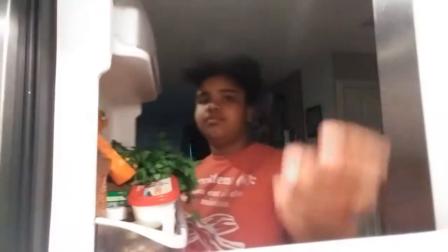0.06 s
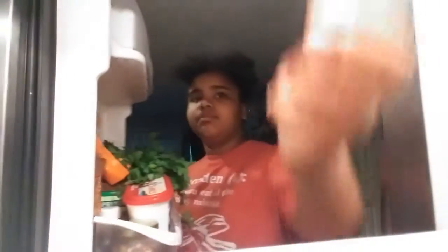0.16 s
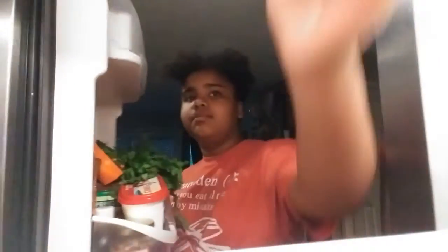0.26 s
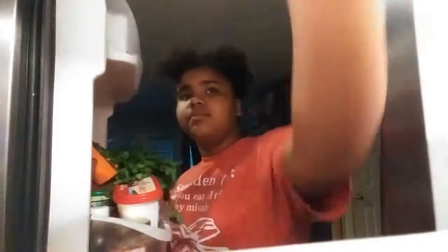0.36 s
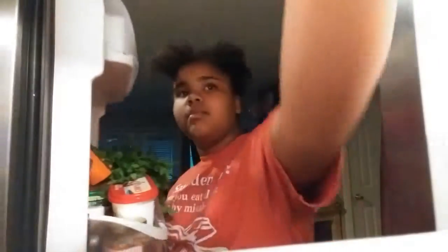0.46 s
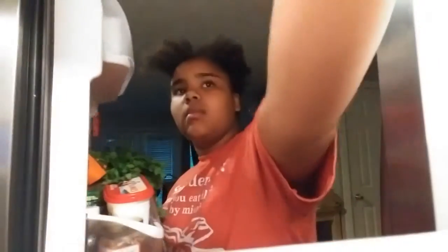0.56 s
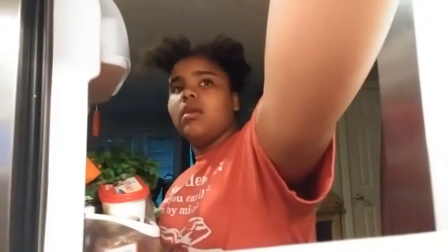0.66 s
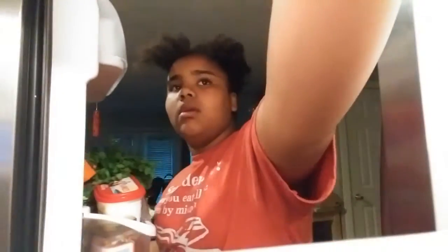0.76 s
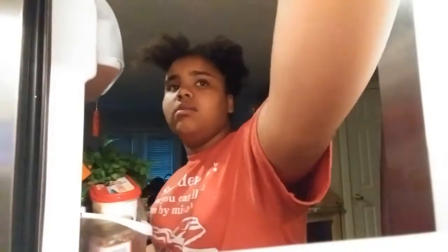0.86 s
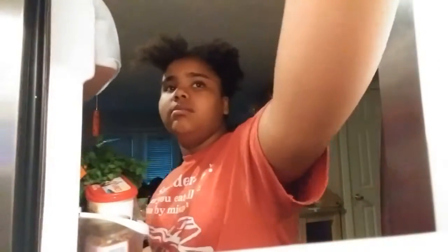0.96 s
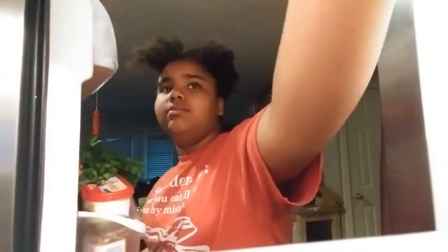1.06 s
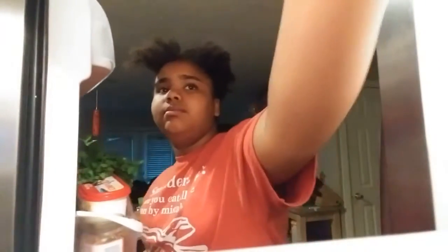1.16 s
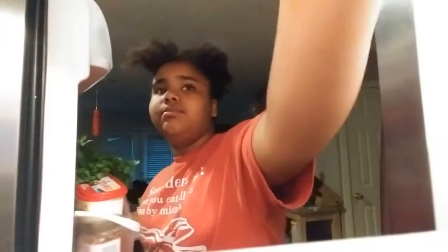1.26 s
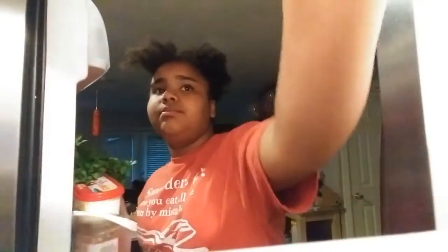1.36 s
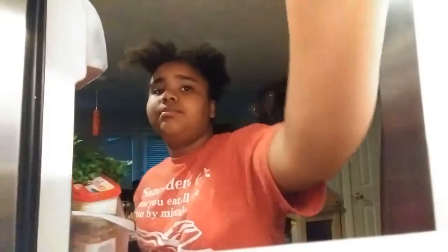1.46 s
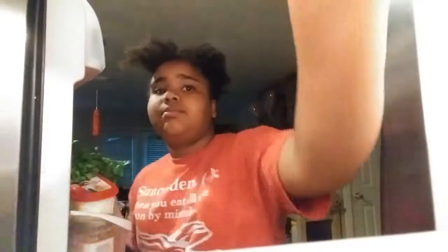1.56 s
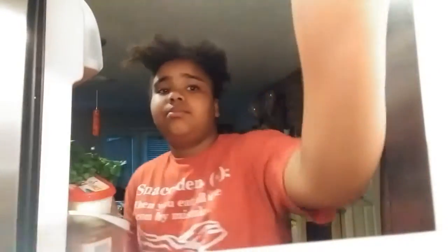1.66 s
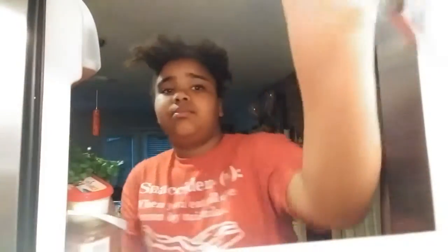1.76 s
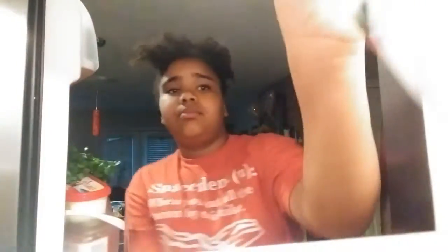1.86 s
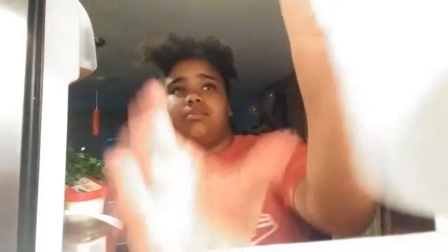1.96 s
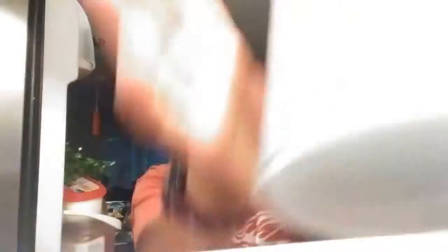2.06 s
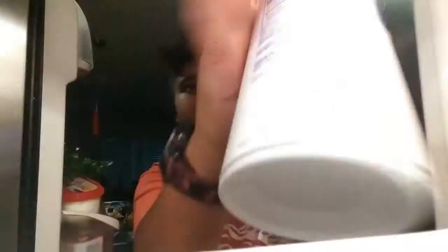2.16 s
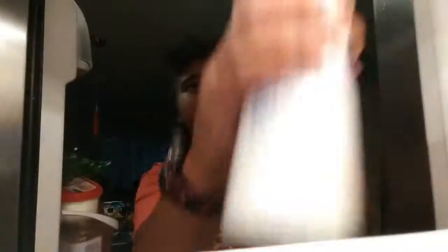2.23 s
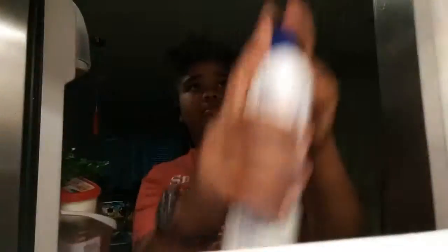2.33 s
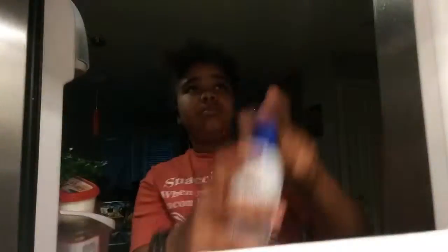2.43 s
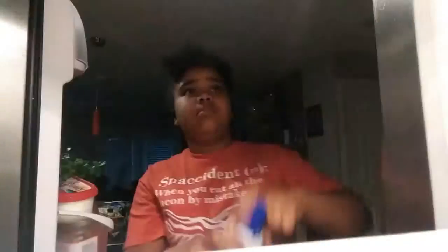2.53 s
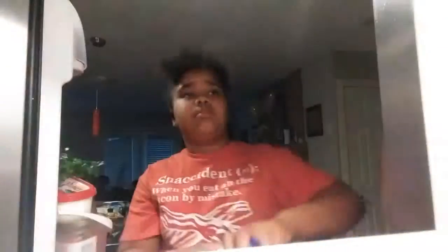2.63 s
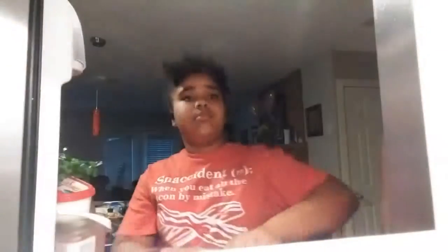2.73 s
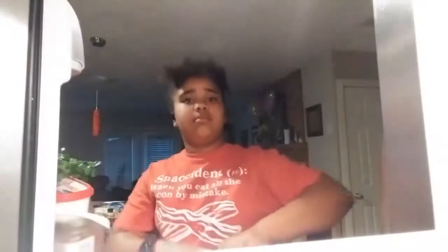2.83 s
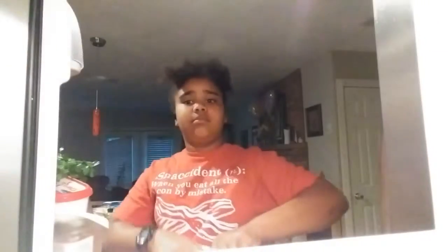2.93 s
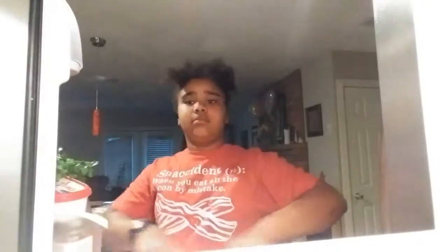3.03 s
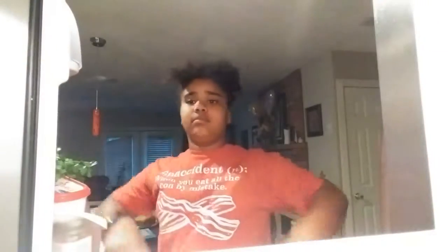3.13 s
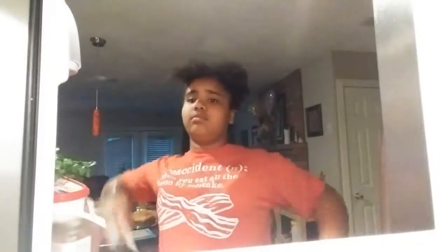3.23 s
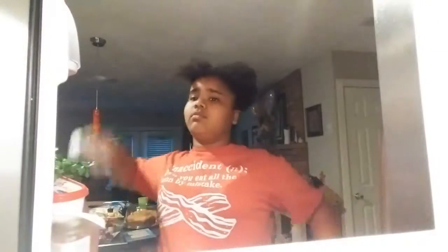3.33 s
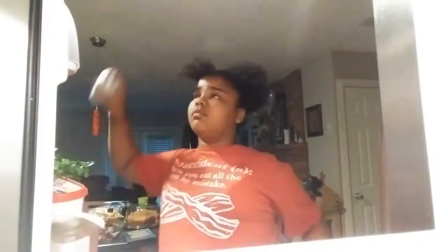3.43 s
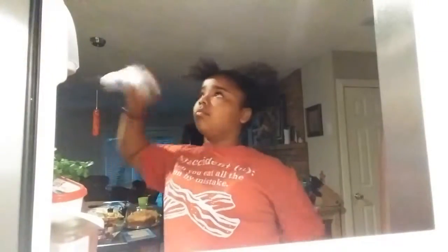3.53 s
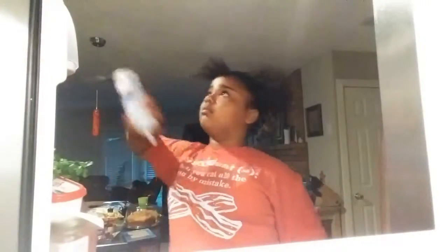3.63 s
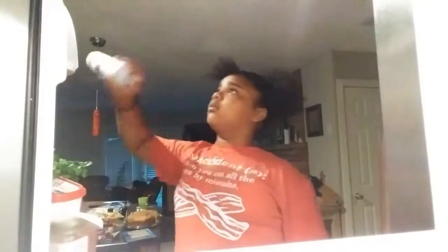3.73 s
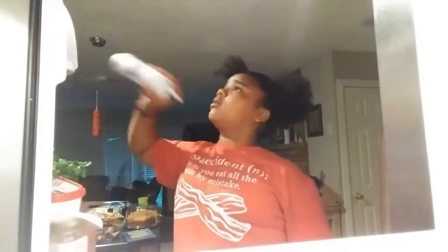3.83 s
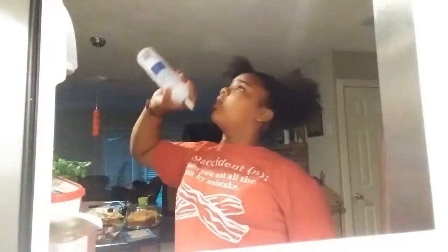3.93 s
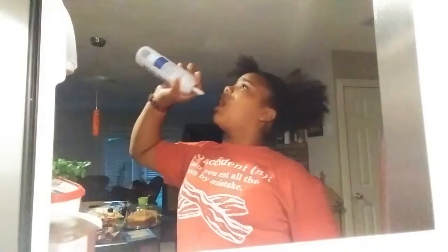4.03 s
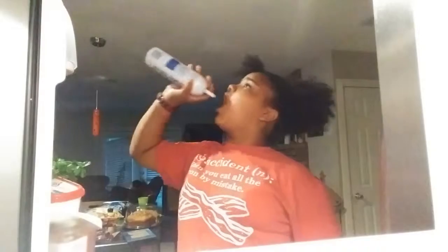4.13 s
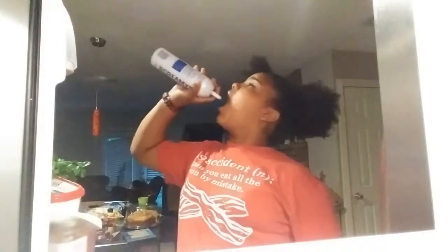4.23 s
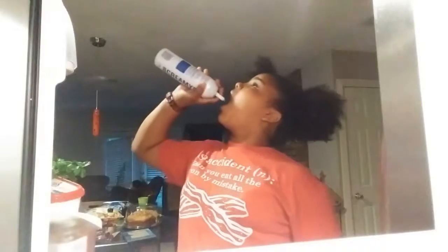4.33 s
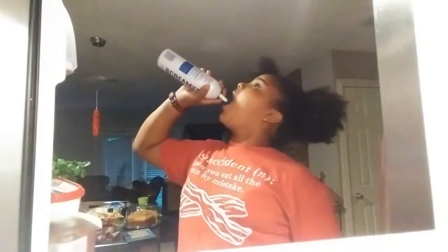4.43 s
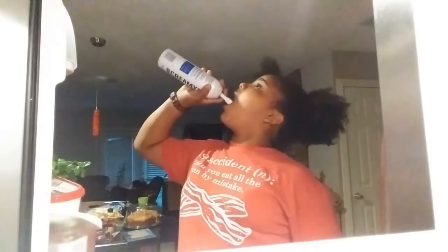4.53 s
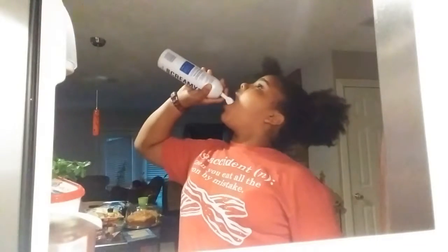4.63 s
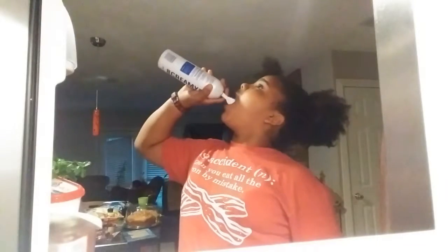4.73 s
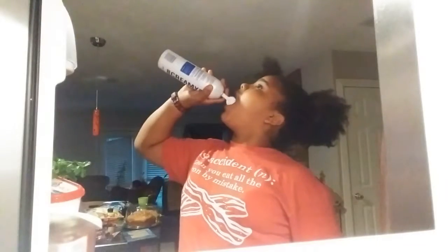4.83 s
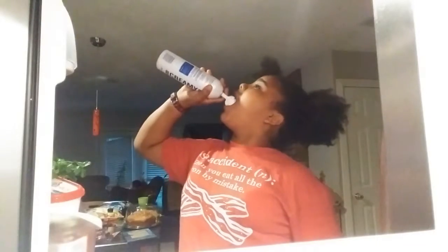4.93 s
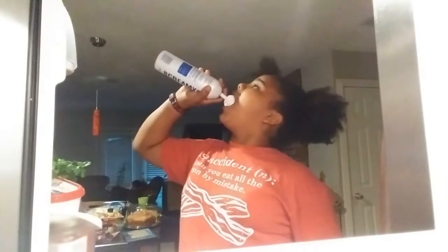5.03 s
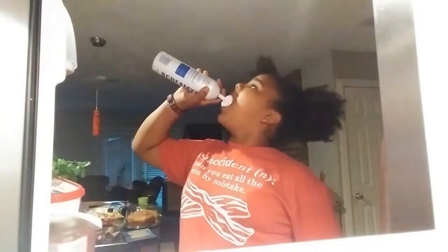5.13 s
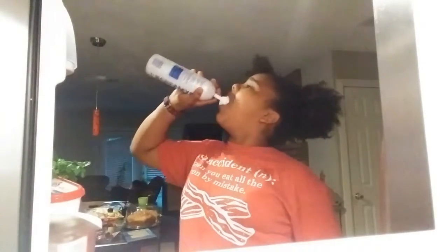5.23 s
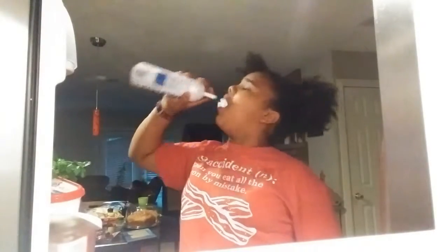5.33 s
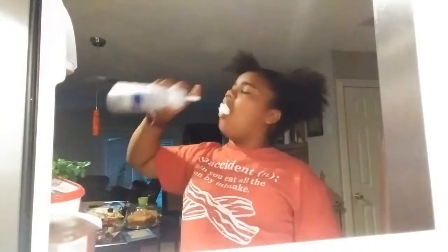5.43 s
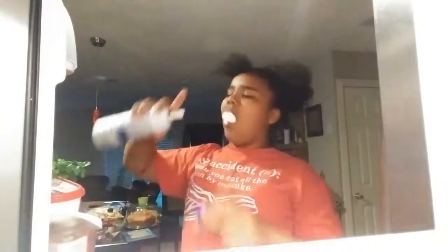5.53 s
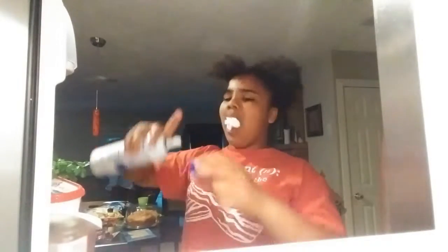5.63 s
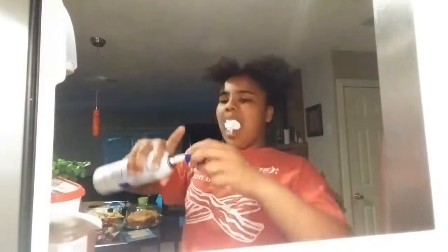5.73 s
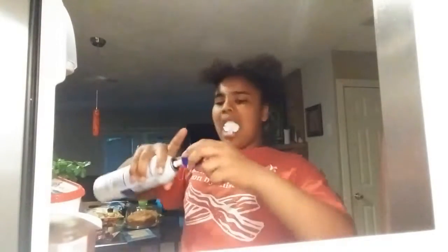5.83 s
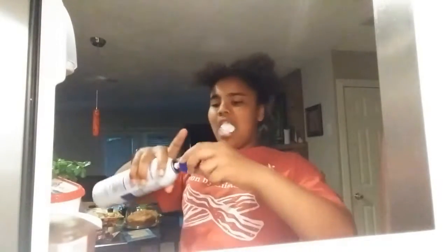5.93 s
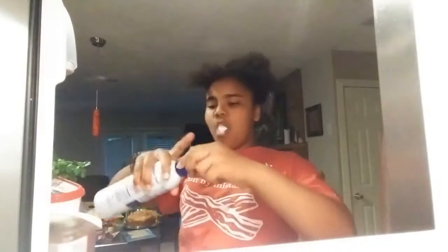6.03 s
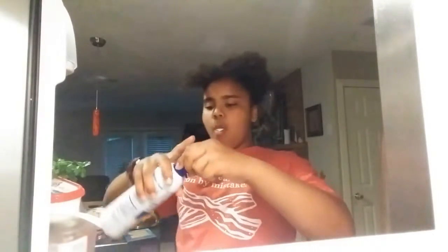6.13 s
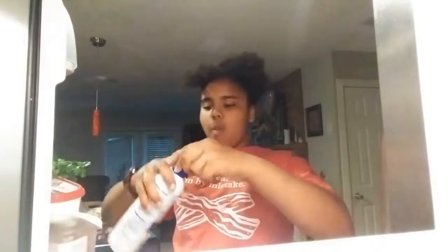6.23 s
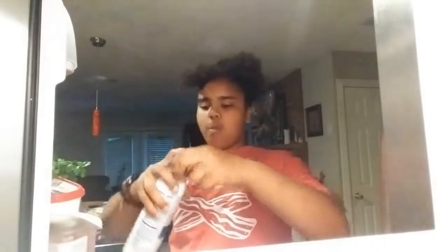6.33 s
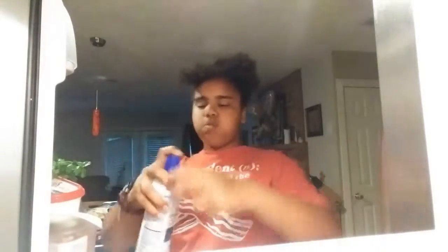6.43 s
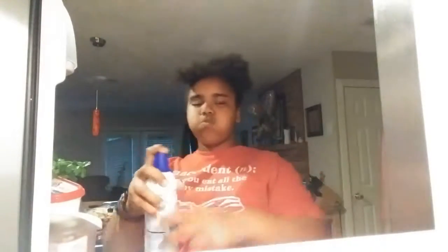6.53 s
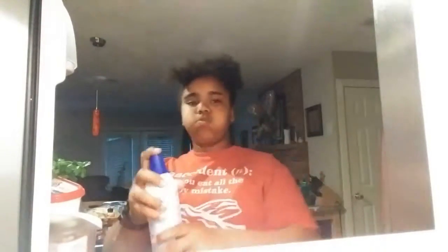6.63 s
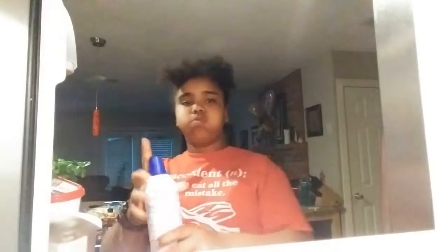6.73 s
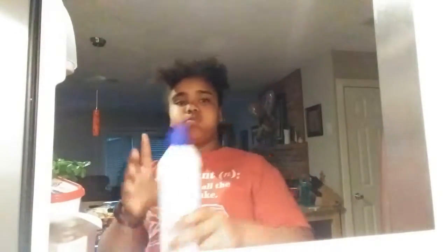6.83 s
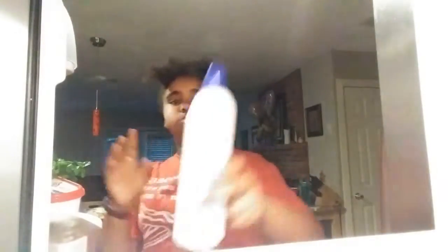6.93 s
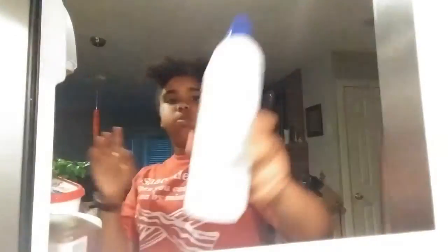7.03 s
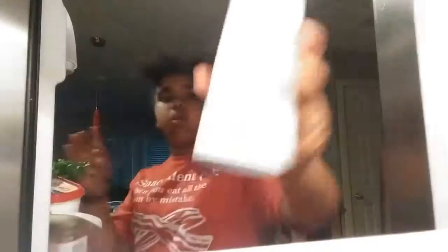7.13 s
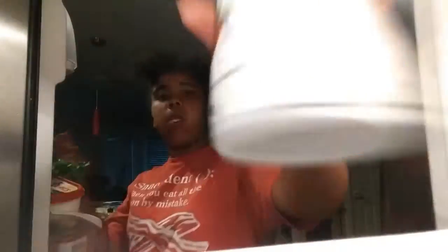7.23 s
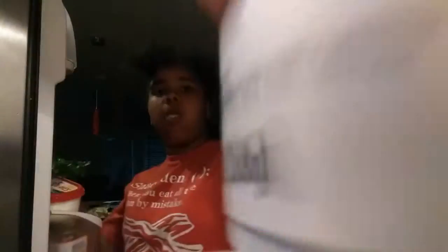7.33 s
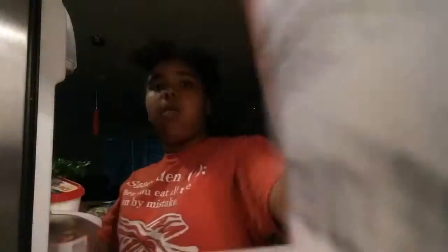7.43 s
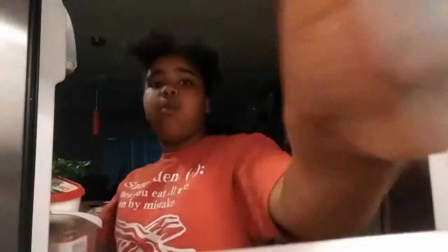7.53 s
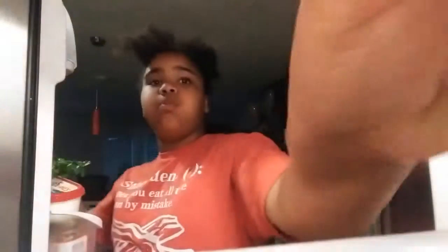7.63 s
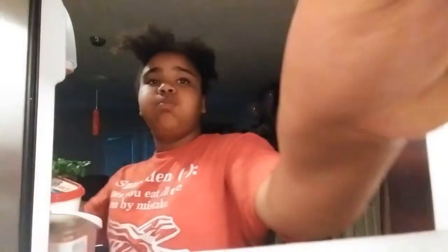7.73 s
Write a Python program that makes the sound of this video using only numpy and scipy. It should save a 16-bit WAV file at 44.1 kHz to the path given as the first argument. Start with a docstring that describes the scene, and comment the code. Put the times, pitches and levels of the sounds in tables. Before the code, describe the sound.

Loud close knocks on a fridge shelf, plastic cap clicks, one short hissing spray of whipped cream, then more knocks over a low hum.

```python
"""Inside a humming fridge, a can of whipped cream is taken from the shelf, uncapped, sprayed once into
an open mouth, capped and put back. Turbulence in the nozzle hisses and the mouth resonates as it fills.
Impacts ring the shelf and the cap, friction rings the can, and a sleeve rustles. The microphone lies
in the fridge: the close knocks are limited, and its port resonates near 8.6 kHz."""
import sys
import numpy as np
from scipy import signal
from scipy.fft import rfft, irfft, next_fast_len
from scipy.io import wavfile
from scipy.ndimage import uniform_filter1d, minimum_filter1d

SR = 44100
rng = np.random.default_rng(int(sys.argv[2]) if len(sys.argv) > 2 else 0)


def log_audio(samples):
    """Write samples as a 16-bit WAV file to the path given in sys.argv[1]."""
    # one column per channel
    frames = np.atleast_2d(samples).T
    # limit to full scale, then quantise
    limited = np.clip(frames, -1, 1)
    pcm = np.round(limited * 32767).astype(np.int16)
    wavfile.write(sys.argv[1], SR, pcm)


N = 342874

# Each row: time in seconds, jet level in dB.
JET_LEVELS = [(4.44, -63), (4.474, -27.5), (4.496, -22.5), (4.544, -17), (5.194, -15.5), (5.246, -19.5),
              (5.266, -34.5), (5.4, -63.5)]
# Each row: frequency in Hz, relative spectral density of the jet in dB.
JET_SPECTRUM = [(200, -39.5), (450, -22.5), (900, -19.5), (1900, -28), (2750, -44), (3300, -24.5),
                (3900, -30), (4700, -22.5), (6300, -39), (7100, -16), (7650, -17), (8400, 1.5),
                (10800, -25.5), (15700, -35.5)]
# Each row: resonance of nozzle or walls in Hz, bandwidth in Hz, relative level in dB.
JET_RESONANCES = [(1058, 80, -17.5), (1590, 74, -23.5), (2175, 94, -17.5), (2410, 55, -20),
                  (3110, 310, -16), (4700, 1500, -25), (7660, 110.6, -22), (8630, 200, -35),
                  (8020, 410, -4.5), (8880, 48, -9.5), (9760, 62, 0), (9220, 86, -2), (11440, 217, -11.5),
                  (12200, 180, -32.5)]
def spray():
    """Turbulent jet noise: gas and cream rush through the nozzle, and bursting bubbles crackle."""
    gate, (jet_db,) = envelopes([JET_LEVELS])
    whistles = rms_one(noise_resonances(JET_RESONANCES))
    flutter = from_db(0.88 * drift(150) + .8 * drift(25))
    jet = flutter * rms_one(coloured(JET_SPECTRUM) + from_db(-8) * whistles)
    age = np.arange(N) / SR - JET_LEVELS[0][0]
    bubbles = from_db(4 * drift(40)) * grains(per_s=1500, spread_db=3.5)
    pops = grains(per_s=120, spread_db=4)
    filling = np.clip(age / .5, 0, 1)   # larger pops come as the mouth fills
    crackle = from_db(-31) * band(bubbles, 800, 5520) + from_db(-24) * filling * band(pops, 880, 5000)
    cavity = mouth(age)
    return gate * from_db(jet_db) * (jet + crackle + sputters() + from_db(2.5 * drift(60)) * cavity)


# Each row: time in seconds, lower resonance in dB over the jet, upper one in Hz and in dB over the jet.
MOUTH_RESONANCES = [(4.47, -35, 1450, -27), (4.58, -20.5, 1437, -19.5), (4.76, -22, 1198, -27),
                    (4.86, -22, 1460, -31), (4.97, -21, 1564, -18.5), (5.08, -26, 1500, -32),
                    (5.22, -16.5, 1490, -27), (5.27, -33, 1480, -21)]
def mouth(age, start_hz=1116, sag_hz_per_s=400):
    """Cavity resonance: as the mouth fills, its lower resonance sinks and its upper one wanders."""
    _, (low_db, high_hz, high_db) = envelopes([MOUTH_RESONANCES])
    low_hz = np.clip(start_hz - sag_hz_per_s * age, 0, start_hz)
    return from_db(low_db) * gliding(low_hz, 140) + from_db(high_db) * gliding(high_hz, 79)


# Each row: start in seconds, level in dB over the jet.
FLOW_BREAKS = [(4.745, -19.5), (4.808, -15), (4.852, -20), (4.965, -9.5), (5.003, -17), (5.045, -9),
               (5.148, -20)]
def sputters(t60=.04):
    """Intermittent flow: each break in the cream spits a decaying burst of noise."""
    t = np.arange(N) / SR
    spits = sum((t >= s) * from_db(db - 60 * np.maximum(t - s, 0) / t60) for s, db in FLOW_BREAKS)
    return spits * rms_one(band(rng.standard_normal(N), 1000, 5500))


# Each row: start in seconds, body level in dB, sharpness and thud in dB over the body,
# contact T60 in seconds, ring frequency in Hz, ring level in dB over the body.
SHELF_KNOCKS = [(0.6389, -37.5, -15, 9, 0.063, 251, -2), (0.7088, -51, -10, 7, 0.036, 635, 15),
                (0.8657, -37, -10, -5, 0.039, 464, -8), (0.9944, -33, -8, -3, 0.12, 410, -2.5),
                (1.1142, -7.5, -5, -16, 0.11, 773, -4), (1.1255, -0.5, -24, -4, 0.055, 710, -6),
                (1.1448, -19, -10.5, 1.5, 0.041, 434, 11), (1.1696, -30, -4, -19, 0.071, 430, 15.5),
                (1.7829, -24, -13, 1, 0.041, 1120, 6), (1.8278, -12.5, -26, -4.5, 0.07, 444, 0),
                (2.0084, -38.5, -11, -1.5, 0.24, 800, 1), (7.364, -1, -12, -2.5, 0.12, 1155, -8),
                (7.3839, 0.5, -27, -21, 0.023, 488, -2), (7.4856, -1.5, -40, -16, .037, 663, -1.5),
                (7.5221, 0, -10, -10.5, 0.085, 1020, -19.5), (7.583, -6.5, -25, -13, 0.034, 1060, -18),
                (7.591, -7, -18, -18.5, 0.056, 450, -9), (7.6558, -10, -41, -16, 0.032, 1650, -9),
                (7.6807, -33, -14, 3.5, 0.056, 436, 9), (7.727, -49.5, 6, -24, 0.28, 371, -13)]
# Each row: mode frequency in Hz, relative gain in dB, T60 in seconds.
SHELF_MODES = [(250, -4, 0.075), (321, 0, 0.12), (386, 8, 0.11), (457, 0.5, 0.26), (693, 3.5, 0.058),
               (970, -35, 0.078), (1109, 10, 0.052), (1556, 5, 0.043), (2140, 11, 0.033), (2980, 2, .04)]
# Each row (crack, body, thud, boom, treble): band edges in Hz, relative tail in dB, its T60 in seconds.
KNOCK_BANDS = [(2370, 5200, -37.5, 1), (546, 2075, -43.5, 0.83), (190, 730, -9, 0.28),
               (79, 153, -9.5, 0.45), (6760, 17400, -18, 0.14)]
def knocks():
    """Impact excitation: blows ring the shelf's modes; stronger ones carry a larger share of crack."""
    start, body, sharp, thud, t60, ring_hz, ring_db = np.transpose(SHELF_KNOCKS)
    crack = 1.2 * body + sharp - 0.5
    boom = 0.76 * body - 22
    levels = [crack, body, body + thud, boom, body + sharp]
    rows = contacts(start, levels, t60, .0005, ring_hz, body + ring_db, ring_t60=1.59 * t60)
    touch = first_touch(start, level_db=body - 4 + 0.22 * sharp, jolt_db=1.9 * body - 35)
    shelf = blows(rows, KNOCK_BANDS, SHELF_MODES, mode_gain_db=10.5)
    return touch + shelf + hollow_rings(rows, width_hz=120)


def first_touch(start, level_db, jolt_db, snap_t60=.012, jolt_s=.011):
    """Contact transient: a click, a snap of noise and one slow push of the shelf on the microphone."""
    click, snap, jolt = np.zeros((3, N + SR))
    age = np.arange(SR // 10) / SR
    push = age / jolt_s * (2 - age / jolt_s) * np.exp(-age / jolt_s)
    for at, db, push_db in zip(np.round(start * SR).astype(int), level_db, jolt_db):
        click[at] += from_db(db + 20)
        snap[at:at + len(age)] += from_db(db - 60 * age / snap_t60)
        jolt[at:at + len(age)] += from_db(push_db) * push
    noise = rms_one(band(rng.standard_normal(N), 990, 3000))
    return band(click[:N] + 1e-18, 500, 4100) + snap[:N] * noise + jolt[:N]


# Each row: start in seconds, treble, crack and body levels in dB, ring in Hz, ring T60 in seconds.
HAND_CLICKS = [(0.6505, -21.5, -39, -42, 860, 0.076), (0.8867, -57, -50, -49, 1430, 0.18),
               (0.939, -38, -61, -45, 1260, .07), (2.177, -31.5, -50, -34.5, 1090, 0.058),
               (2.2229, -23.5, -37, -29.5, 1070, 0.058), (2.2984, -24, -36, -30, 1150, 0.028),
               (2.505, -14.5, -23.5, -13.5, 940, 0.032), (2.708, -28, -41.5, -48.5, 1520, .07),
               (3.0004, -43, -57, -44, 1040, 0.095), (3.02, -29.5, -40, -37, 1910, 0.11),
               (3.0356, -30, -33, -31, 1230, 0.091), (3.046, -7, -24.5, -24.5, 1380, .17),
               (3.5824, -40, -64, -51, 1420, .08), (3.692, -29.5, -48, -55, 1690, .08),
               (3.7645, -43, -46, -55, 1420, .08), (3.9543, -33.5, -47.5, -47, 2040, .06),
               (3.997, -39, -54, -48, 1740, .05), (4.0207, -50, -59, -45, 900, .11),
               (4.1874, -46, -62, -61, 1164, .05), (6.1093, -29, -41.5, -27.5, 1820, 0.19),
               (6.13, -26.5, -33, -34, 1810, 0.046), (6.1369, -15.5, -22.5, -22.5, 1350, 0.097),
               (6.15, -30, -48, -34.5, 1380, 0.23), (6.5595, -30.5, -36, -43.5, 1440, 0.083),
               (6.6697, -53, -51, -56, 1460, 0.13), (6.7486, -42, -45, -45, 980, .07)]
# Each row (crack, body, treble): band edges in Hz, relative tail level in dB, tail T60 in seconds.
CLICK_BANDS = [(2600, 6440, -27, 0.31), (600, 2170, -26.5, 0.36), (7100, 18500, -23.5, 0.25)]
def clicks(t60=.032, rise_s=.0031):
    """Damped vibration: plastic cap, nozzle and can snap in the hands and ring briefly."""
    start, treble, crack, body, ring_hz, ring_t60 = np.transpose(HAND_CLICKS)
    rows = contacts(start, [crack, body, treble], t60, rise_s, ring_hz, body + 1.1, ring_t60)
    return blows(rows, CLICK_BANDS) + hollow_rings(rows, width_hz=320)


# Each row: start in seconds, body level in dB, sharpness in dB over the body, rise in seconds,
# ring frequency in Hz, ring level in dB over the body.
RIM_CATCHES = [(1.108, -24, -13, .0006, 1200, -14), (1.3073, -17, -17.5, 0.0064, 1060, -19),
               (1.3132, -20.5, -9.5, 0.0079, 1330, 10.5), (1.3506, -29, -15, 0.002, 1390, -2.5),
               (1.3697, -28, -5, 0.0069, 1410, 13), (1.385, -35, -9, .0046, 1400, 11),
               (1.3934, -30, -20, 0.0038, 1400, -4), (1.418, -23, -20, 0.0027, 1650, 4.5),
               (1.6649, -31, -11, 0.0034, 1050, -4), (1.6905, -31, -18, .006, 1430, 6.5),
               (1.7218, -22.5, -12, 0.011, 1400, 8), (1.767, -42, 4, 0.0029, 1400, 4),
               (2.132, -22, -0.5, 0.019, 1760, 6.5)]
# Each row (crack, body, treble): band edges in Hz, relative tail level in dB, tail T60 in seconds.
SCUFF_BANDS = [(2430, 4200, -43, 0.14), (644, 2040, -27, 0.14), (6530, 18000, -16.5, 0.13)]
def scuffs(t60=.051):
    """Stick and slip: the rim catches on the shelf and lets go, ringing the can."""
    start, body, sharp, rise_s, ring_hz, ring_db = np.transpose(RIM_CATCHES)
    levels = [body + sharp + 1.8, body, body + sharp]
    rows = contacts(start, levels, t60, rise_s, ring_hz, body + ring_db, ring_t60=.044)
    return blows(rows, SCUFF_BANDS) + hollow_rings(rows, width_hz=120)


# One list per stroke. Each row: time in seconds, level in dB, crack in dB, ringing in dB over the level.
DRAG_STROKES = [
    [(1.24, -40, -56, -4), (1.296, -29, -66, -9), (1.418, -37.5, -68.5, 1), (1.52, -48, -84, -12)],
    [(1.6, -37.5, -51, -7.5), (1.686, -42.5, -74, -9), (1.78, -34, -45, -6)],
    [(1.87, -30.5, -59, -31), (1.962, -34, -60, -23), (2.092, -35, -52, -6.5), (2.155, -35, -52, -23),
     (2.2, -64, -80, -18)],
]
# Each row: mode frequency in Hz, relative level in dB, T60 in seconds.
CAN_MODES = [(1067, -0.5, 0.15), (1414, 6.5, 0.16), (1670, 4, 0.032), (2530, 1.5, 0.053), (3420, -6, 0.081)]
def drag():
    """Sliding friction: dense slips of the rim over the shelf excite the modes of the can."""
    gate, (level_db, crack_db, ring_db) = envelopes(DRAG_STROKES)
    slips = grains(per_s=2500, spread_db=3.1)
    ringing = sum(from_db(db) * rms_one(resonate(slips, hz, bandwidth(t60))) for hz, db, t60 in CAN_MODES)
    body = from_db(ring_db) * rms_one(ringing) + 0.56 * rms_one(band(slips, 215, 1320))
    crack = rms_one(band(slips, 1100, 3800))
    return gate * from_db(0.86 * drift(40)) * (from_db(level_db) * body + from_db(crack_db) * crack)


# One list before the spray, one after. Each row: time in seconds, level in dB.
ARM_MOVES = [
    [(0.0, -55), (0.16, -57.5), (0.2, -49.5), (0.33, -48), (0.36, -52), (0.6, -58.5), (0.75, -60),
     (0.95, -53), (1.2, -56), (1.33, -44.5), (1.55, -58), (1.76, -42), (2.11, -43.5), (2.2, -53),
     (2.33, -53), (2.6, -58), (2.72, -54), (2.77, -47.5), (2.98, -57.5), (3.24, -45.5), (3.38, -56.5),
     (3.58, -61.5), (3.73, -51.5), (3.92, -59.5), (4.1, -65)],
    [(6.5, -66), (6.62, -54), (6.98, -51), (7.13, -60), (7.25, -49), (7.33, -64), (7.45, -43), (7.77, -47)],
]
# Each row: frequency in Hz, relative spectral density in dB. The treble peak is the microphone's port.
RUSTLE_SPECTRUM = [(470, -45), (800, -1.5), (976, -4.5), (1070, -18), (1370, -0.5), (1470, 4), (2110, -8),
                   (2250, -14), (3390, -10), (3800, -13), (5120, -10), (5940, -25), (8420, 4), (15700, -27)]
def rustle():
    """Friction noise: moving sleeve and skin give a hiss that flickers a little."""
    gate, (level_db,) = envelopes(ARM_MOVES)
    return gate * from_db(level_db + 1.8 * drift(22) + 2.1 * drift(2)) * coloured(RUSTLE_SPECTRUM)


# Fridge air, then microphone hiss. Each row: frequency in Hz, relative spectral density in dB.
AIR_SPECTRUM = [(15, -62), (33, -47), (46, -19.5), (124, -11.5), (150, -16.5), (168, -9), (225, -3),
                (257, -9), (715, -13), (787, -19.5), (866, -15), (2500, -27), (3250, -74), (5500, -120)]
HISS_SPECTRUM = [(1470, -56), (2500, -9.5), (5430, -7.5), (6540, -15.5), (8690, 3.5), (11100, -11.5),
                 (11500, -5), (13700, -15.5), (14900, -4.5), (15700, -16)]
# Compressor orders and two thin whines. Each row: frequency in Hz, bandwidth in Hz, level in dB.
FRIDGE_TONES = [(122.8, 7.1, -58), (177, 8, -59.5), (234.3, 15, -53.5), (416.8, 15, -60), (455, 15, -59.5),
                (11750, 190, -71.5), (14400, 120, -71.5)]
def fridge(air_db=-50, hiss_db=-62):
    """Stationary noise: broadband air and microphone hiss lie under wavering narrowband tones."""
    tones = noise_resonances(FRIDGE_TONES)
    return from_db(air_db) * coloured(AIR_SPECTRUM) + from_db(hiss_db) * coloured(HISS_SPECTRUM) + tones


def walls(x, level_db=-9.5, t60=.059):
    """Reverberation: dense reflections inside the fridge join the direct sound and ripple its spectrum."""
    age = np.arange(SR // 5) / SR
    echoes = rng.standard_normal(len(age)) * from_db(-60 * age / t60) * (age > .001)
    echoes *= from_db(level_db) / np.linalg.norm(echoes)
    return x + signal.fftconvolve(x, echoes)[:N]


def contacts(start, levels_db, t60, rise_s, ring_hz, ring_db, ring_t60):
    """One row per impact: start, band levels, contact envelope, ring."""
    columns = np.broadcast_arrays(start, *levels_db, t60, rise_s, ring_hz, ring_db, ring_t60)
    return np.column_stack(columns)


def blows(events, bands, modes=(), mode_gain_db=0):
    """Exponential decay: in each band a noise burst leaves a tail and drives any modes in that band."""
    out, age = np.zeros(N), np.arange(SR // 2) / SR
    for k, (low_hz, high_hz, tail_db, tail_t60) in enumerate(bands):
        burst, tail = np.zeros((2, N + SR))
        for start, *levels_db, t60, rise_s, _, _, _ in events:
            at = slice(round(start * SR), round(start * SR) + len(age))
            burst[at] += from_db(levels_db[k] - 60 * age / t60) * np.minimum(age / rise_s, 1)
            tail[at] += from_db(levels_db[k] + tail_db - 60 * age / tail_t60) * np.minimum(age / .0047, 1)
        # the port resonance colours the top band
        noise = coloured(RUSTLE_SPECTRUM) if high_hz > SR / 4 else rng.standard_normal(N)
        noise = rms_one(band(noise, low_hz, high_hz))
        out += band(noise * (burst + tail)[:N], low_hz / 0.96, high_hz * 1.96)
        force = rng.standard_normal(N) * burst[:N]
        for hz, db, t60 in modes:
            if low_hz <= hz < high_hz:
                out += from_db(db + mode_gain_db) * resonate(force, hz, bandwidth(t60))
    return out


def hollow_rings(events, width_hz):
    """Resonance of a struck hollow, its pitch set by where it is held or how far it stands open."""
    out, age = np.zeros(N + SR), np.arange(SR // 4) / SR
    shakes = rng.standard_normal((len(events), SR // 2))
    for shake, (start, *_, rise_s, hz, level_db, t60) in zip(shakes, events):
        tone = rms_one(resonate(resonate(shake, hz, width_hz), hz, width_hz))[-len(age):]
        swell = np.minimum(age / rise_s, 1)
        at = round(start * SR)
        out[at:at + len(age)] += from_db(level_db - 60 * age / t60) * swell * tone
    return out[:N]


def from_db(db):
    """Amplitude ratio of a level."""
    return 10 ** (np.asarray(db) / 20)


def rms_one(x):
    """Normalisation to unit rms."""
    return x / np.sqrt(np.mean(x ** 2) + 1e-20)


def envelopes(spans):
    """A gate open inside the spans, and their columns linearly interpolated over time."""
    t = np.arange(N) / SR
    times, *columns = np.transpose(np.vstack(spans))
    gate = sum((t >= rows[0][0]) & (t <= rows[-1][0]) for rows in spans)
    return uniform_filter1d(gate * 1., size=600), [np.interp(t, times, column) for column in columns]


def coloured(spectrum):
    """Spectral shaping of white noise, at unit rms."""
    hz, level_db = np.transpose(spectrum)
    size = next_fast_len(N)
    grid_hz = np.fft.rfftfreq(size, 1 / SR) + 1
    gain = from_db(np.interp(np.log(grid_hz), np.log(hz), level_db))
    return rms_one(irfft(rfft(rng.standard_normal(size)) * gain, size)[:N])


def drift(rate_hz):
    """Random fluctuation: low-passed noise at unit rms."""
    r = np.exp(-2 * np.pi * rate_hz / SR)
    return rms_one(signal.lfilter([1], [1, -2 * r, r * r], rng.standard_normal(N + SR))[SR:])


def bandwidth(t60):
    """Damping: the width in Hz of a mode that falls 60 dB in t60 seconds."""
    return np.log(1000) / np.pi / t60


def resonate(x, hz, width_hz):
    """A second-order resonator with unit peak gain."""
    r = np.exp(-np.pi * width_hz / SR)
    feedback = [1, -2 * r * np.cos(2 * np.pi * hz / SR), r * r]
    return signal.lfilter([(1 - r * r) / 2, 0, (r * r - 1) / 2], feedback, x + 1e-18)


def noise_resonances(peaks):
    """Forced vibration: one white noise drives parallel resonators."""
    white = rng.standard_normal(N)
    return sum(from_db(db) * rms_one(resonate(white, hz, width_hz)) for hz, width_hz, db in peaks)


def gliding(hz, spread_hz):
    """Quadrature modulation: two slow noises form a narrow band around a moving centre."""
    phase = 2 * np.pi * np.cumsum(hz) / SR
    return rms_one(drift(spread_hz) * np.cos(phase) + drift(spread_hz) * np.sin(phase))


def grains(per_s, spread_db):
    """Shot noise: random clicks of uneven size."""
    sizes = from_db(spread_db * np.minimum(rng.exponential(1, N), 5)) * rng.choice([-1, 1], N)
    return rms_one(sizes * (rng.random(N) < per_s / SR))


def band(x, low_hz, high_hz):
    """Band-pass filtering."""
    edges_hz = [low_hz, min(high_hz, .45 * SR)]
    return signal.sosfilt(signal.butter(2, edges_hz, "band", fs=SR, output="sos"), x)


def scene():
    """Superposition of all sources at one microphone."""
    return (knocks() + clicks() + walls(scuffs() + drag() + rustle() + spray()) + fridge())[None]


def record(dry):
    """Peak limiting with a brief look-ahead, then band limiting of the lowest bass and highest treble."""
    ceiling, release_db_per_s = .68, 200
    fall_db = release_db_per_s * np.arange(N) / SR
    over_db = np.maximum(20 * np.log10(np.abs(dry[0]) / ceiling + 1e-9), 0)
    held_db = np.maximum.accumulate(over_db + fall_db) - fall_db
    gain_db = uniform_filter1d(minimum_filter1d(-held_db, size=45), size=45)
    high_pass = signal.butter(2, 35, "high", fs=SR, output="sos")
    low_pass = signal.ellip(12, .5, 70, 15750, fs=SR, output="sos")
    return signal.sosfilt(low_pass, signal.sosfilt(high_pass, dry * from_db(gain_db)))


dry = scene()
out = record(dry)
log_audio(out)
```